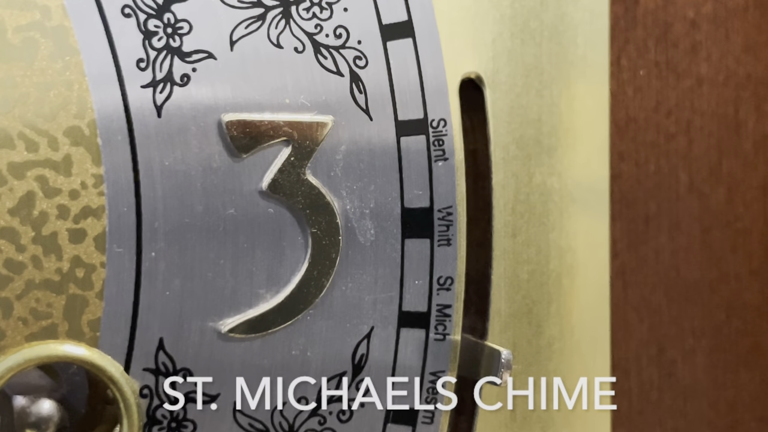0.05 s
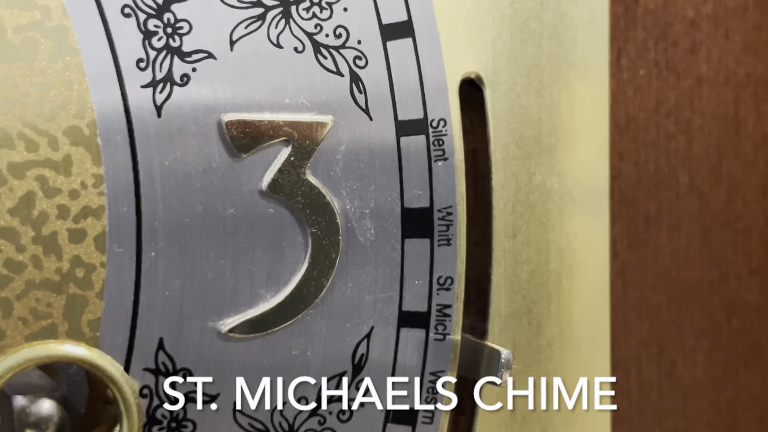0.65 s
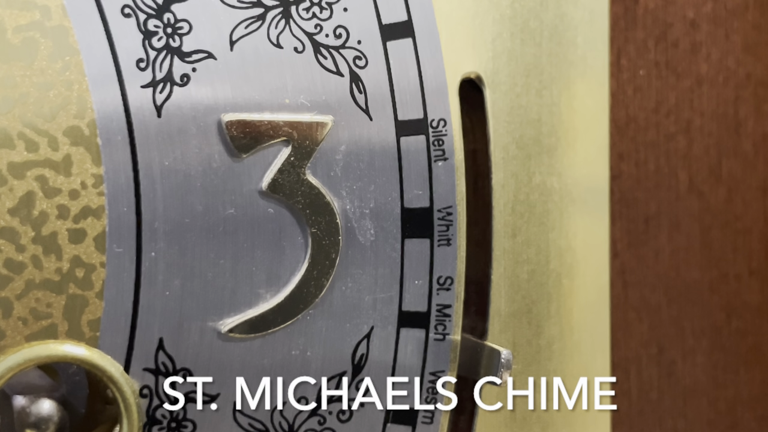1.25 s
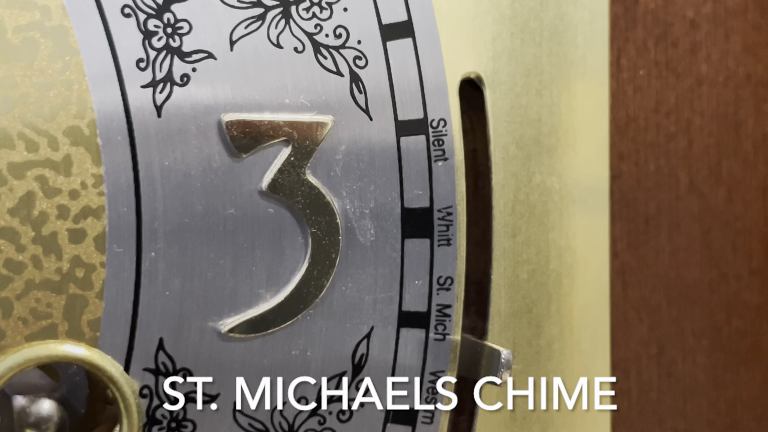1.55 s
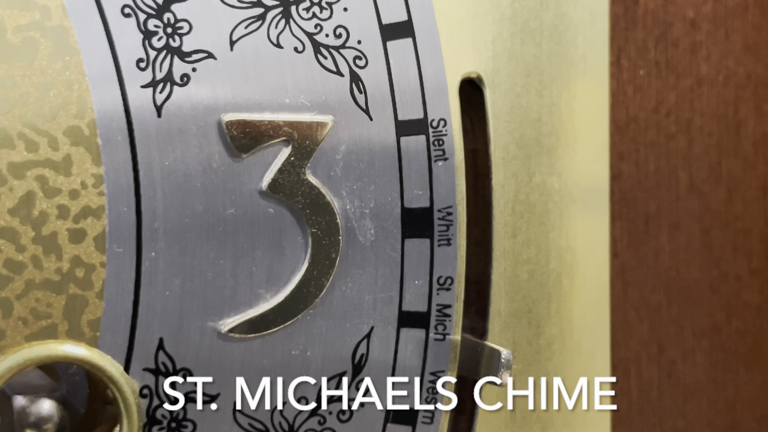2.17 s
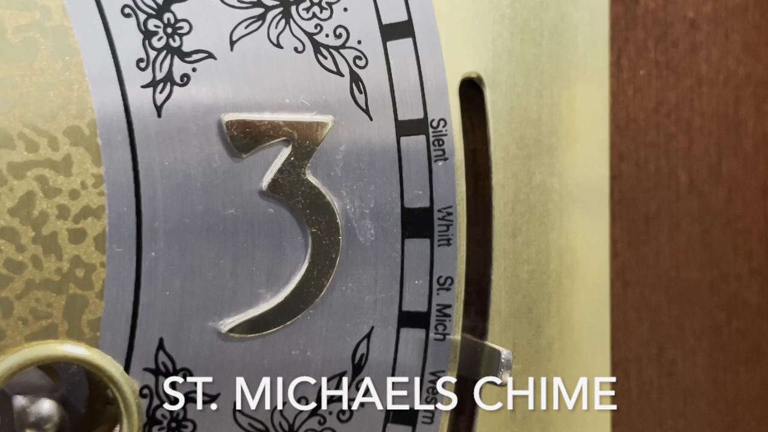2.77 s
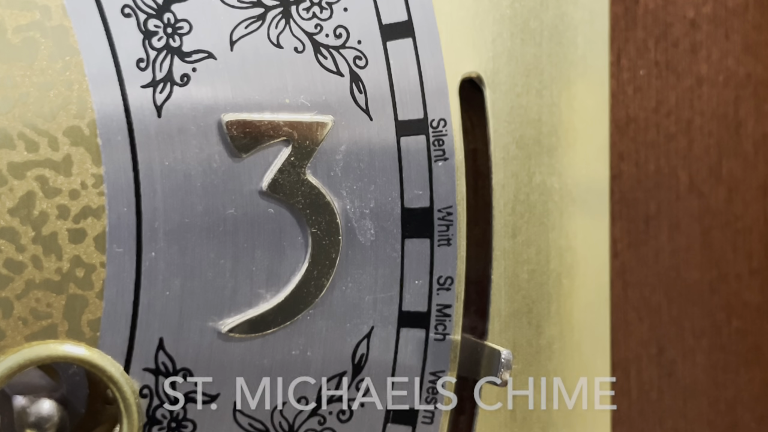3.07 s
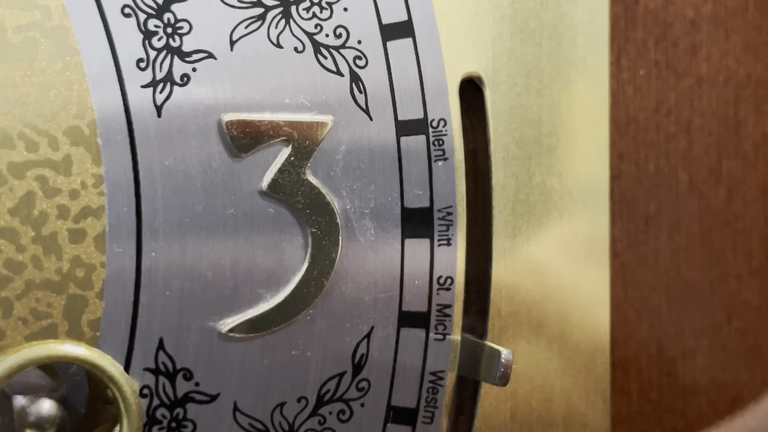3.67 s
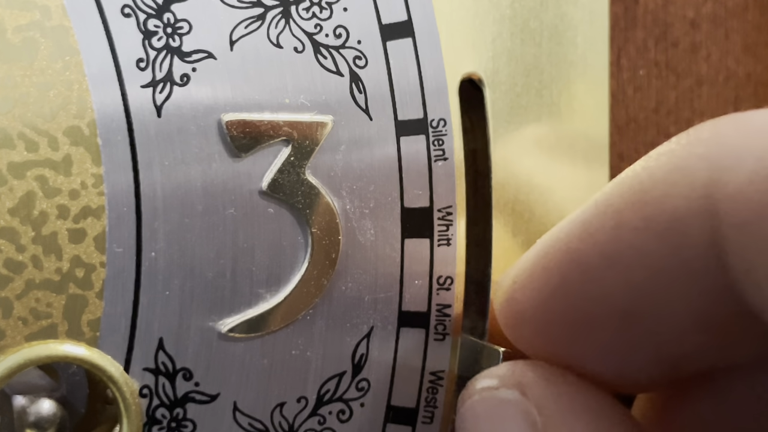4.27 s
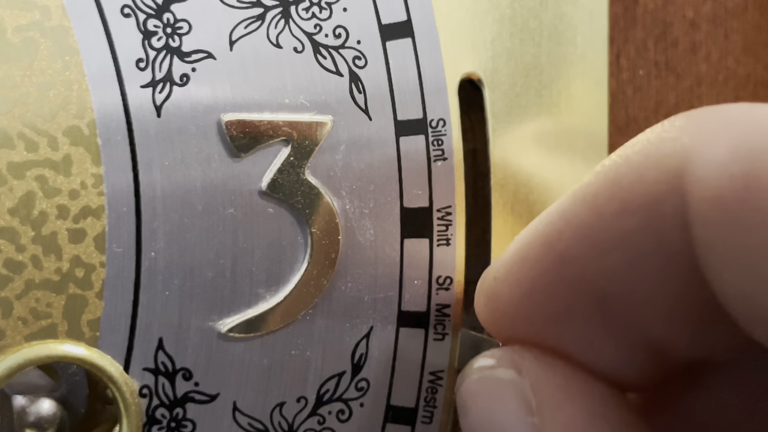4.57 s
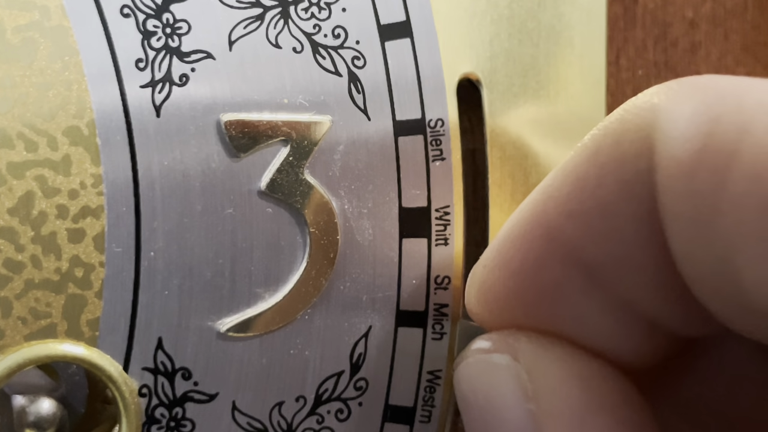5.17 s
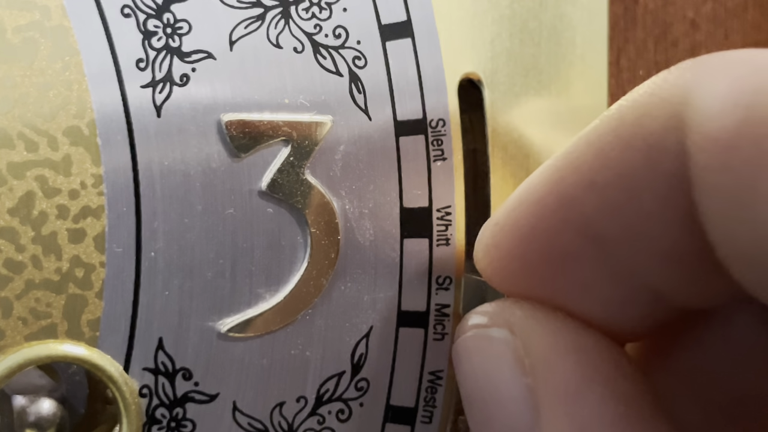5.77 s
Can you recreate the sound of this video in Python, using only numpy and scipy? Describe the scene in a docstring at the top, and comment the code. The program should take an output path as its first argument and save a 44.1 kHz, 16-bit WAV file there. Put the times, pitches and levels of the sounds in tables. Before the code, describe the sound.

A mechanical clock ticks quickly and steadily in a quiet room, with soft handling bumps and one louder clunk as a lever shifts.

```python
"""A chiming clock ticks five times a second, close to a stereo microphone in a quiet room.
Its balance escapement rattles the brass plates; fine steel parts shimmer and the case rings hollow.
A hand bumps and presses the wooden case, then shifts the chime selector lever one notch with a clunk.
The undamped chime rods hum faintly over a low room rumble."""
import sys
import numpy as np
from scipy import signal
from scipy.fft import rfft, irfft, next_fast_len
from scipy.io import wavfile
from scipy.ndimage import uniform_filter1d

SR = 44100
rng = np.random.default_rng(int(sys.argv[2]) if len(sys.argv) > 2 else 0)


def dump(signal):
    """Clip the signal to [-1, 1] and save it as 16-bit WAV at the path in sys.argv[1]."""
    limited = np.clip(np.atleast_2d(signal).T, -1, 1)
    pcm = np.round(limited * 32767).astype(np.int16)
    wavfile.write(sys.argv[1], SR, pcm)


N = 265482


def amp(db):
    """Decibels to gain."""
    return 10 ** (np.asarray(db) / 20)


def seconds(length_s):
    """Time axis in s."""
    return np.arange(int(length_s * SR)) / SR


def fade(t, t60_s):
    """Exponential decay from t = 0, silent before."""
    return (t >= 0) * np.exp(-np.log(1000) * np.maximum(t, 0) / t60_s)


def curve(points, hz):
    """Interpolate (frequency [Hz], value) points on a log frequency axis."""
    point_hz, value = np.transpose(points)
    return np.interp(np.log(hz + 1), np.log(point_hz), value)


def colour(x, points, peaks=(), tilt_db_oct=0):
    """Minimum-phase filter from a spectrum, extra resonances and a tilt above about 1 kHz."""
    size = 2 * next_fast_len(len(x))
    hz = np.arange(size // 2 + 1) * SR / size
    db = curve(points, hz) + tilt_db_oct * np.log2(1 + hz / 1000)
    for centre_hz, width_hz, peak_db in peaks:
        db = db + peak_db / (1 + (2 * (hz - centre_hz) / width_hz) ** 2)
    cepstrum = irfft(np.log(amp(db)))
    cepstrum[1:size // 2] *= 2
    cepstrum[size // 2 + 1:] = 0
    return irfft(rfft(x, size) * np.exp(rfft(cepstrum)))[:len(x)]


def flat_noise(t, t60_s, smooth_hz=250):
    """Decaying noise with its broad spectral humps flattened."""
    noise = rng.standard_normal(len(t)) * fade(t, t60_s)
    power = uniform_filter1d(np.abs(rfft(noise)) ** 2, max(int(smooth_hz * len(t) / SR), 1))
    hz = np.arange(len(power)) * SR / len(t)
    return colour(noise, np.column_stack([hz + 1, -10 * np.log10(power)]))


def burst(x, db):
    """Scale a short sound to the energy of 10 ms at this level."""
    return x * amp(db) / np.sqrt(np.sum(x ** 2) / (SR / 100))


def add(track, start_s, sound):
    """Mix a sound into a track, cropped at both ends."""
    i = int(start_s * SR)
    sound = sound[max(-i, 0):N - i]
    track[max(i, 0):max(i, 0) + len(sound)] += sound


def stereo(mid, side, side_db=0):
    """Mid and side to left and right."""
    return mid + amp(side_db) * side * np.array([[1], [-1]])


def stereo_noise(spectrum, side_db, mono_below_hz):
    """Coloured noise with a unit-rms mid; the deepest bass is alike in both channels."""
    mid, side = (colour(rng.standard_normal(N), spectrum) for _ in range(2))
    side = signal.lfilter(*signal.butter(1, mono_below_hz, "high", fs=SR), side)
    return stereo(mid, side, side_db) / np.std(mid)


# room noise: (frequency [Hz], relative density [dB])
ROOM_SPECTRUM = [(20, -27.5), (35, -11.5), (55, 1.5), (100, -3), (140, -7), (270, -15), (400, -27.5),
                 (600, -34.5), (950, -39), (1150, -46.5), (3000, -51.5), (7000, -55), (12500, -58.5),
                 (15000, -68)]


def room_rumble(level_db=-58):
    """Steady low rumble with faint hiss."""
    return amp(level_db) * stereo_noise(ROOM_SPECTRUM, side_db=-12.5, mono_below_hz=70)


def wall_reverb(x, wet_db, t60_s, side_db, build_s=0.012):
    """The walls return a light, diffuse tail."""
    t = seconds(0.961)
    mid, side = rng.standard_normal((2, len(t))) * fade(t, t60_s) * (1 - np.exp(-t / build_s))
    tails = stereo(mid, side, side_db) / np.linalg.norm(mid)
    return amp(wet_db) * signal.fftconvolve(x[None], tails, axes=1)[:, :N]


# side part of the dial's reflection: (frequency [Hz], gain [dB])
DIAL_SPECTRUM = [(100, -12.5), (300, -13), (600, -12.5), (1200, -18), (2500, -34), (5000, -7.5),
                 (12000, -23.5)]


def with_dial_reflection(x, t60_s=0.011):
    """Direct sound plus the nearby dial's reflection, which differs at each microphone port."""
    t = seconds(.02)
    scatter = rng.standard_normal(len(t)) * fade(t, t60_s)
    reflection = signal.fftconvolve(x, scatter / np.linalg.norm(scatter))[:N]
    return stereo(x, colour(reflection, DIAL_SPECTRUM))


# rod partials: (frequency [Hz], starting rms level before waver [dB], decay [dB/s])
ROD_PARTIALS = [(195.54, -61, 1.9), (261.38, -63, 1.3463), (292.9, -71, 0.7758), (344.8, -79, 0),
                (974.5, -90, 1), (2480, -100, 1.5)]


def chime_rods(waver_db=3.0):
    """Undamped rods hum on, beating at 1-2 Hz as they sway."""
    out, t = np.zeros(N), np.arange(N) / SR
    for hz, start_db, decay_db_s in ROD_PARTIALS:
        phase, sway_phase, extra_hz = rng.random(3)
        sway = np.sin(2 * np.pi * ((1 + extra_hz) * t + sway_phase))
        level_db = start_db - decay_db_s * t + waver_db * sway
        out += np.sqrt(2) * amp(level_db) * np.sin(2 * np.pi * (hz * t + phase))
    return out


# finger presses: (time [s], level [dB], t60 [s])
FINGER_PRESSES = [(2.79, -55.5, 1.0), (3.263, -47.5, .22), (4.009, -54.5, 2), (4.31, -58.5, 0.5),
                  (4.528, -56.5, 0.03), (5.278, -44, 0.67), (5.43, -53.5, 0.11), (5.571, -45.5, 0.47),
                  (5.703, -46, 0.52), (5.92, -56.5, 1.5)]
# their rumble in the wood: (frequency [Hz], gain [dB])
PRESS_SPECTRUM = [(25, -23.5), (62, 2), (125, 1.5), (170, -5.5), (245, 1), (320, -12.5), (450, -16.5),
                  (590, -19.5), (750, -39), (1500, -46), (4000, -67)]


def finger_rumble(attack_s=.015, hold_s=.02):
    """Each press builds quickly, holds, and leaves a rumble dying away in the wood."""
    pressure, t = np.zeros(N), np.arange(N) / SR
    for start_s, db, t60_s in FINGER_PRESSES:
        rise = np.clip((t - start_s) / attack_s, 0, 1)
        release = fade(np.maximum(t - start_s - attack_s - hold_s, 0), t60_s)
        pressure += amp(db) * rise * release
    return pressure * stereo_noise(PRESS_SPECTRUM, side_db=-7, mono_below_hz=110)


# steel lever: (frequency [Hz], gain [dB])
STEEL_SPECTRUM = [(500, 10.5), (1100, -8.5), (1700, 9.5), (2400, -5), (3800, -2.5), (4700, 1), (6500, -1.5),
                  (7800, 2.5), (8900, 8), (10500, -0.5), (12200, -0.5), (14500, -30)]


def lever_slip(start_s=5.255, level_db=-37):
    """The lever scrapes out of its notch just before landing in the next."""
    out, t = np.zeros(N), seconds(0.108)
    grit = rng.standard_normal(len(t)) * amp(2.7 * rng.exponential(size=len(t)))
    scrape = colour(grit * fade(t, t60_s=.05), STEEL_SPECTRUM, tilt_db_oct=6)
    add(out, start_s, burst(scrape, level_db))
    return out


# lever resonances: (frequency [Hz], width [Hz], gain [dB])
LEVER_PEAKS = [(2950, 300, 13), (5900, 350, 8), (8800, 300, 4)]


def steel_click(t, ring_db=-24):
    """The steel lever snaps, then rings faintly."""
    envelope = fade(t, t60_s=.016) + amp(ring_db) * fade(t, t60_s=0.22)
    return colour(rng.standard_normal(len(t)) * envelope, STEEL_SPECTRUM, LEVER_PEAKS)


# modes of case and dial: (frequency [Hz], relative level [dB], t60 [s])
CASE_MODES = [(116, -11, .4), (168, -19, .2), (215, -17, .2), (253, -15, .25), (340, -2.5, .21),
              (458, 1.5, .17), (533, -4, .17), (583, 1.5, .2), (678, 0, .18), (767, -5, .13),
              (832, -5, .15), (895, -9, .13), (974, -12, .13), (1120, -12, .09), (1264, -5, .1),
              (1330, -8.5, .13), (1541, -6, .1), (1690, -6, .095), (1883, -14, .13), (2003, -18, .11),
              (2110, -22, .1), (2965, -11.5, .17)]
# dense, quickly damped wood response: (frequency [Hz], gain [dB])
WOOD_SPECTRUM = [(50, -23.5), (130, -10.5), (300, 0), (560, 8), (800, 3), (1000, -3.5), (1650, -2.5),
                 (2400, -12), (3100, -13), (5000, -19), (12000, -32)]


def wood_thud(t, corner_hz, crack_t60_s, tilt_db_oct, modes_db=-4.0, tail_db=-12, scatter_db=1.8):
    """A panel cracks, the case rings and a dull tail lingers; a soft contact passes only the lows."""
    # neighbouring modes swing in opposite directions
    weights = amp(scatter_db * rng.standard_normal(len(CASE_MODES))) * (-1) ** np.arange(len(CASE_MODES))
    modes = sum(weight * amp(db) * np.sin(2 * np.pi * hz * t) * fade(t, t60_s)
                for weight, (hz, db, t60_s) in zip(weights, CASE_MODES))
    crack = colour(flat_noise(t, crack_t60_s), WOOD_SPECTRUM)
    tail = colour(flat_noise(t, t60_s=0.13), WOOD_SPECTRUM, tilt_db_oct=-3)
    body = burst(crack, 0) + burst(modes, modes_db) + burst(tail, tail_db)
    body = signal.lfilter(*signal.butter(2, corner_hz, fs=SR), body)
    return colour(body, [(1000, 0)], tilt_db_oct=tilt_db_oct)


# blows on case and lever:
# (time [s], wood level [dB], contact corner [Hz], crack t60 [s], wood tilt [dB/oct], click level [dB])
BLOWS = [(2.4349, -51.5, 1500, 0.0114, 3.5, -67), (2.5215, -59, 2000, 0.0174, 0, -71.5),
         (2.7858, -49, 1700, 0.0285, 10, -51), (2.849, -64, 600, .02, -0.5, -72),
         (3.2624, -51, 3400, .028, 5, -76), (3.273, -45.5, 90, .034, 2, -96),
         (3.283, -59, 3500, 0.21, 3.5, -82), (4.235, -66.5, 900, 0.042, 0.5, -80.5),
         (4.539, -58.5, 380, .034, 2.5, -84.5), (5.2618, -33.5, 3500, 0.0083, -2.5, -48.5),
         (5.2635, -40.5, 5500, 0.019, 1.5, -37.5), (5.2662, -32, 1600, .036, -.5, -47),
         (5.2775, -26.5, 1500, .026, -.5, -52), (5.3105, -32, 1600, 0.015, 0.5, -58),
         (5.319, -44.5, 494, .018, -1, -66.5), (5.435, -56.5, 615, .07, 6, -88),
         (5.577, -50.5, 420, 0.062, 9.5, -87.5), (5.705, -57, 2300, 0.115, 1.5, -95)]


def knocks():
    """Hand and lever strike the case: each blow is a wooden thud plus a steel click."""
    out, t = np.zeros(N), seconds(.5)
    for start_s, wood_db, corner_hz, crack_t60_s, tilt_db_oct, click_db in BLOWS:
        thud = wood_thud(t, corner_hz, crack_t60_s, tilt_db_oct)
        add(out, start_s, burst(thud, wood_db) + burst(steel_click(t), click_db))
    return out


# hollow after-ring: (time [s], level offset [dB])
ECHO_LEVELS = [(.7, 2), (1.15, -7), (2.0, -7), (2.4, -3), (4.9, -3), (5.4, 0)]


def case_echo(ticks, base_db=-15):
    """The wooden cavity answers each tick with a short, hollow ring."""
    spectrum_hz_db = [(200, 14.0), (400, 20.5), (600, 17), (900, 1), (2000, 5.0), (4000, 1.5),
                      (8000, -29.5)]
    ring = flat_noise(seconds(.3), t60_s=0.18)
    cavity = colour(ring / np.linalg.norm(ring), spectrum_hz_db)
    gain_db = base_db + np.interp(np.arange(N) / SR, *np.transpose(ECHO_LEVELS))
    return amp(gain_db) * signal.fftconvolve(ticks, cavity)[:N]


# ring of the fine steel parts: (frequency [Hz], gain [dB])
SHIMMER_SPECTRUM = [(3000, -22.5), (5000, -13), (6500, -5.5), (9000, -11.5), (10200, 1), (11500, 3),
                    (12400, -4), (13200, -18.5), (14500, -28.5)]
# its strength: (time [s], level re drop [dB])
SHIMMER_LEVELS = [(0, -21.5), (1.7, -25.5), (2.7, -16), (3.7, -13), (4.3, -23.5), (5.0, -18), (6.0, -29)]


def shimmer(beat_s, drop_db, late_db=-13):
    """Fine steel parts sing on after a beat: a quick fall, then a faint long ring."""
    t = seconds(.6)
    envelope = fade(t, t60_s=0.14) + amp(late_db) * fade(t, t60_s=0.81)
    ring = colour(rng.standard_normal(len(t)) * envelope, SHIMMER_SPECTRUM)
    return burst(ring, drop_db + np.interp(beat_s, *np.transpose(SHIMMER_LEVELS)))


# brass plates and dial: (frequency [Hz], gain [dB])
PLATE_SPECTRUM = [(300, -11), (600, -11), (850, -7.5), (1200, -32), (1800, -23), (2100, -22), (2450, -30),
                  (3050, -22), (3600, -27.5), (4300, -19), (5400, -19.5), (6500, -8.5), (11900, 0),
                  (12900, -14), (14800, -37)]
# sharper resonances of the movement: (frequency [Hz], width [Hz], gain [dB])
MOVEMENT_PEAKS = [(585, 70, 3), (1850, 150, 3), (3080, 200, 4), (4300, 200, 3), (6620, 200, 5),
                  (8050, 280, 5), (9950, 400, 4), (8950, 900, -3), (10950, 400, -4)]


def tick(t, pallet_ring, rattle_db, tilt_db_oct, slide_s=.0095, bank_s=.0048, rebound_s=.008):
    """The pallet lever unlocks, a tooth slides and drops at t = 0, the lever banks and rebounds."""
    jitter_s = rng.standard_normal(4) * 0.00049
    scatter_db = rng.standard_normal(4) * 1.5

    def contact(at_s, db):
        """One pallet rings the plates much alike each time; loose wheels chatter on."""
        ring = np.roll(pallet_ring, int((at_s - t[0]) * SR)) + rng.standard_normal(len(t))
        chatter = amp(-24.5) * fade(t - at_s, t60_s=0.18)
        return amp(db) * ring * (fade(t - at_s, t60_s=0.03435) + chatter)

    slide = amp(-22) * rng.standard_normal(len(t)) * (t > -slide_s) * (t < 0)
    touch = contact(-slide_s - .007 + jitter_s[0], -25 + scatter_db[0])
    unlock = contact(-slide_s + jitter_s[1], -15 + scatter_db[1])
    drop = contact(0, 0)
    bank = contact(bank_s + jitter_s[2], scatter_db[2])
    rebound = contact(rebound_s + jitter_s[3], -4 + scatter_db[3])
    click = colour(touch + unlock + slide + drop, PLATE_SPECTRUM, MOVEMENT_PEAKS, tilt_db_oct)
    # banking shakes the whole frame, so it sounds fuller than the drop
    rattle = colour(bank + rebound, PLATE_SPECTRUM, MOVEMENT_PEAKS, tilt_db_oct - 3)
    return burst(click, 0) + burst(rattle, rattle_db + 0.5)


# tick and tock: (lag [s], drop level [dB], nominal rattle re drop [dB], tilt [dB/oct])
PALLET_PAIR = [(0, -51.5, -3.5, -0.16), (.0019, -49.5, -3.5, 0.1056)]


def escapement(first_s=.1659, period_s=.199995, slowing_s_per_beat=.0000119, lead_s=.02):
    """Two pallets alternate, slightly out of beat, each with its own ring; the balance barely slows."""
    out, t = np.zeros(N), seconds(.1) - lead_s
    rings = rng.standard_normal((2, len(t)))
    for k in range(-1, int(N / SR / period_s)):
        lag_s, drop_db, rattle_db, tilt_db_oct = PALLET_PAIR[k % 2]
        beat_s = first_s + k * (period_s + slowing_s_per_beat * k / 2) + lag_s
        # chance differences from tooth to tooth
        rattle_offset, tilt_offset, drop_offset = rng.standard_normal(3) * (1.05, 0.9858, 0.1063)
        beat = tick(t, rings[k % 2], rattle_db + rattle_offset, tilt_db_oct + tilt_offset)
        add(out, beat_s - lead_s, amp(drop_db + drop_offset) * beat)
        add(out, beat_s, shimmer(beat_s, drop_db))
    return out


def scene():
    """Clock and hand in the room."""
    ticks = escapement()
    ticks = ticks + case_echo(ticks)
    blows = knocks() + lever_slip()
    walls = wall_reverb(ticks, wet_db=-26.5, t60_s=0.72, side_db=-9.0)
    walls += wall_reverb(blows, wet_db=-24.5, t60_s=0.368, side_db=-13)
    return with_dial_reflection(ticks + blows) + walls + finger_rumble() + chime_rods() + room_rumble()


# phase between the microphone ports: (frequency [Hz], left lead [rad])
PORT_LEAD = [(100, 0), (300, .45), (600, .62), (850, 1.4), (980, 1.1), (1100, .5), (1250, .8), (1400, .15),
             (1700, 0), (5200, .45), (5700, -1.5), (6900, -.8), (7600, -2.3), (8700, -3.1), (11000, -4.5),
             (12200, -5.3), (13200, -6.1)]
# their balance: (frequency [Hz], left minus right [dB])
PORT_LEVELS = [(60, 1), (130, 1), (260, 2.3), (400, 2.3), (600, 4.3), (850, 7), (1000, 1), (1300, 3),
               (2300, .3), (12000, .4)]


def record(dry, cutoff_hz=14600):
    """Two close microphone ports differ in phase and level; the top is cut steeply."""
    size = next_fast_len(N + SR)
    hz = np.arange(size // 2 + 1) * SR / size
    half = np.array([[.5], [-.5]])
    ports = amp(half * curve(PORT_LEVELS, hz)) * np.exp(1j * half * curve(PORT_LEAD, hz))
    heard = irfft(rfft(dry, size) * ports, size)[:, :N]
    return signal.sosfilt(signal.ellip(8, .2, 70, cutoff_hz, fs=SR, output="sos"), heard)


dry = scene()
out = record(dry)
dump(out)
```